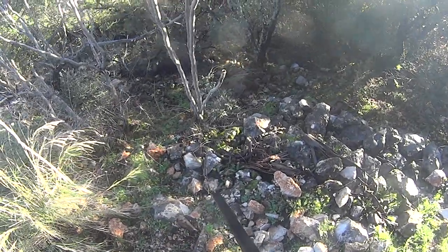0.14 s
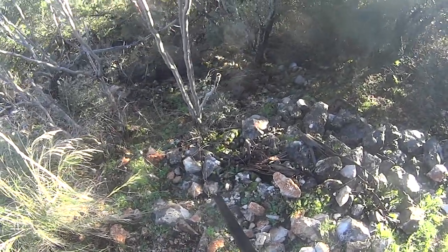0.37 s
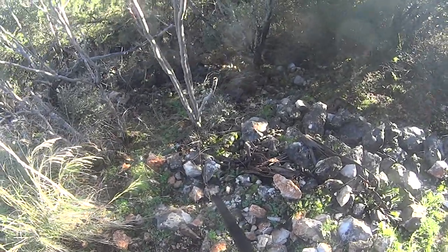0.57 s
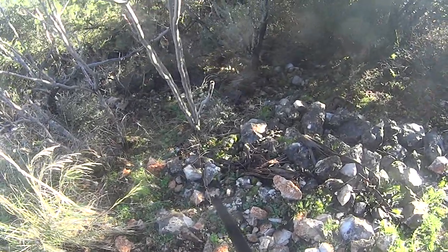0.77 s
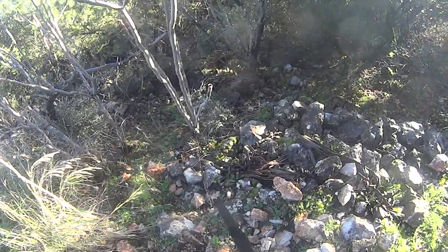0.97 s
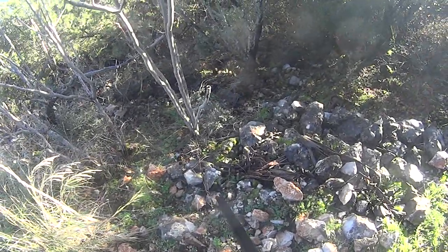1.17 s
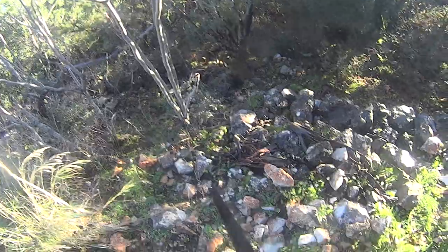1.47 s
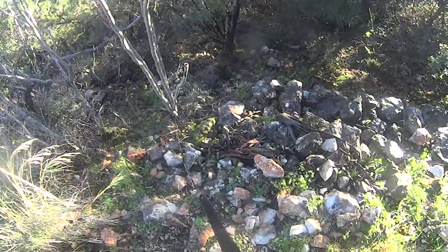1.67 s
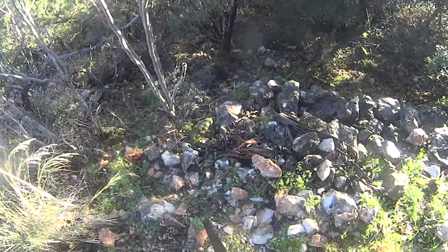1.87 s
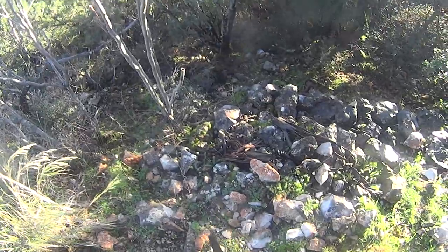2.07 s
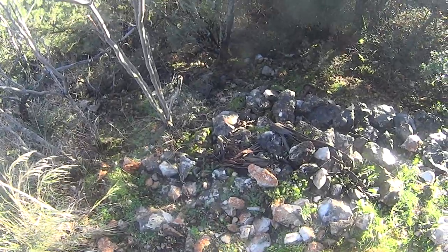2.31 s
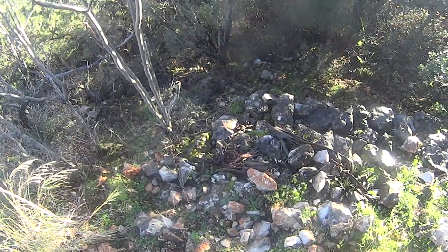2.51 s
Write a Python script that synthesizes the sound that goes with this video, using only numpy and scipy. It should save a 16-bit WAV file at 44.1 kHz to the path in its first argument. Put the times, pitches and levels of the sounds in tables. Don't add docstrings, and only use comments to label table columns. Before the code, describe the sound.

A young wild boar squeals three times, at about 0.9, 1.4 and 2.1 seconds, each under 0.2 seconds, nasal, falling in pitch and breaking into roughness, with short scattered reflections from scrub. Close twig snaps, stone knocks and grass rustle are dense and loudest in the first 0.8 seconds, sharpest near 0.13, then sparser, with another snap near 2.1, fading over faint outdoor hush by 2.6.

```python
import sys
import numpy as np
from scipy import signal
from scipy.fft import rfft, irfft, next_fast_len
from scipy.io import wavfile
from scipy.ndimage import uniform_filter1d

SR = 44100
rng = np.random.default_rng(int(sys.argv[2]) if len(sys.argv) > 2 else 0)


def attenuation_scalar(level_db):
    decades = np.asarray(level_db, float) / 20
    return 10 ** decades


def wav_out(sig):
    wavfile.write(sys.argv[1], SR, np.round(np.clip(np.atleast_2d(sig).T, -1, 1) * 32767).astype(np.int16))


N = 116865


def evened(x):
    return x / np.sqrt(np.mean(x ** 2) + 1e-20)


def slow_noise(first, second):
    noise = uniform_filter1d(rng.standard_normal(N), first)
    return evened(uniform_filter1d(noise, second))


def read(points, hz):
    f, value = np.transpose(points)
    return np.interp(np.log(hz + 1), np.log(f + 1), value)


def colour(x, gain):
    size = next_fast_len(N + SR // 4)
    return irfft(rfft(x, size) * gain(np.fft.rfftfreq(size, 1 / SR)), size)[..., :N]


def peak(hz, centre_hz, width):
    return 1j * hz * width / (centre_hz ** 2 - hz ** 2 + 1j * hz * width)


def housing(hz):
    # (frequency [Hz], width [Hz], level [dB])
    cavities = [(2900, 420, 8), (4750, 700, 5), (7900, 1500, 0)]
    return sum(attenuation_scalar(db) * peak(hz, f, w) for f, w, db in cavities)


def ports(x):
    # (frequency [Hz], lead [radians])
    lead = [(100, 0.23), (600, 1.4), (1200, 0.5), (2100, 1.11), (2900, 0.34), (5800, 0.3), (11000, 0.046)]
    # (frequency [Hz], difference [dB])
    tilt = [(100, -13), (1000, -0.5), (3000, -0.7), (8000, 1.5)]

    def turn(hz):
        return np.exp(.5j * read(lead, hz)) * attenuation_scalar(.5 * read(tilt, hz))

    return np.array([colour(x, turn), colour(x, lambda hz: 1 / turn(hz))])


def spread(one, other):
    # (frequency [Hz], correlation [-1 to 1])
    likeness = [(60, 1), (170, 0.3), (490, -0.58), (1420, -0.5), (4060, 0.052), (11700, 0.44)]

    def same(hz):
        return np.clip(read(likeness, hz), -1, 1)

    unlike = colour(other, lambda hz: np.sqrt(1 - same(hz) ** 2))
    return np.array([one, colour(one, same) + unlike])


def scrub(x):
    t60_s, level_db = 0.27, -3
    t = np.arange(SR // 2) / SR
    taps = rng.standard_normal((2, len(t))) * (rng.random((2, len(t))) < .05)
    taps = taps * attenuation_scalar(-60 * t / t60_s) * (t > .008)
    taps = taps / np.linalg.norm(taps[0])
    return attenuation_scalar(level_db) * signal.fftconvolve(x[None], taps, axes=1)[:, :N]


def hush():
    # (frequency [Hz], level [dB])
    air_tone = [(15, -10), (25, -14), (500, -9), (970, -11.5), (11300, -25), (14700, -40), (22000, -120)]
    noise = colour(rng.standard_normal((2, N)), lambda hz: attenuation_scalar(read(air_tone, hz)))
    return attenuation_scalar(-58) * spread(*evened(noise))


def patchy(x):
    patch_db = 2.5
    z = signal.stft(x, nperseg=256)[2]
    field = uniform_filter1d(rng.standard_normal(z.shape[1:]), size=6, axis=0)
    field = evened(uniform_filter1d(field, size=9, axis=1))
    return signal.istft(z * attenuation_scalar(patch_db * field), nperseg=256)[1][:, :N]


def grass():
    # (time [s], level [dB])
    stirring = [(0, -45.5), (.15, -46), (.33, -51), (.43, -55), (.46, -48), (.56, -43), (.68, -53.5),
                (1.1, -49), (1.24, -53), (1.36, -63), (1.47, -51.5), (1.72, -59.5), (1.872, -52),
                (1.96, -66), (2.1, -56), (2.35, -59.5), (2.55, -57), (2.65, -69)]
    # (frequency [Hz], level [dB])
    rustle_tone = [(410, -77), (700, -10), (2400, -8.5), (2800, -4), (4510, -5.5), (8060, -6), (11300, -14),
                   (14700, -47), (22000, -120)]
    grains_per_s, grain_spread_db, hiss_db = 2600, 1, -1
    housing_db, near_db, around_db = -5.5, -1.5, -6

    size = attenuation_scalar(grain_spread_db * np.minimum(rng.exponential(1, (3, N)), 3))
    size = size * rng.standard_normal((3, N))
    grains = evened(size * (rng.random((3, N)) < grains_per_s / SR))
    rustle = grains + attenuation_scalar(hiss_db) * rng.standard_normal((3, N))

    def tone(hz):
        return attenuation_scalar(read(rustle_tone, hz)) * (1 + attenuation_scalar(housing_db) * housing(hz))

    near, one, other = evened(patchy(colour(rustle, tone)))
    s, db = np.transpose(stirring)
    level = attenuation_scalar(np.interp(np.arange(N) / SR, s, db))
    return level * (attenuation_scalar(near_db) * ports(near) + attenuation_scalar(around_db) * spread(one, other))


def thud():
    knock_times = [.0392, .1278, .129, .382, .4192, .5965, .5988, .7136, .9515, 1.0055, 1.1885, 1.2085,
                   2.0948]
    # (peak level [dB], ring [Hz], width [Hz])
    pieces = [(-32.5, 3100, 1100), (-8.5, 5000, 5600), (-41, 580, 560), (-37.5, 1030, 270),
              (-21.5, 4440, 6500), (-43.5, 3200, 650), (-28, 2960, 420), (-20.5, 6350, 3200),
              (-28, 2200, 5400), (-36, 430, 1400), (-26, 9100, 6200), (-41, 4750, 990), (-24, 5600, 5800)]
    splinter_db, splinter_s = -19, .003
    out, t = np.zeros(N), np.arange(1024) / SR
    hz = np.fft.rfftfreq(1024, 1 / SR)
    for s, (db, ring_hz, width) in zip(knock_times, pieces):
        splinters = rng.standard_normal(1024) * np.exp(-t / splinter_s)
        blow = (t == 0) + attenuation_scalar(splinter_db) * splinters
        knock = irfft(rfft(blow) * peak(hz, ring_hz, width) ** 2)
        out[round(s * SR):][:1024] += attenuation_scalar(db) * knock / abs(knock).max()
    return out


def snaps(rows, sharpness):
    tick_s, late_s = .00015, .0008
    creak_s, creak_db = .001, -23
    rattle_s, rattle_db = .003, -22
    notch_hz, notch_width_hz = 2370, 520
    lead = 128
    t, out = (np.arange(1024) - lead) / SR, np.zeros(N + 1024)
    hz = np.fft.rfftfreq(1024, 1 / SR)
    creak = attenuation_scalar(creak_db) * np.exp(t / creak_s)
    rattle = attenuation_scalar(rattle_db) * np.exp(-abs(t) / rattle_s)
    for s, db, ring_hz in rows:
        tick = rng.standard_normal(1024) * np.exp(-abs(t) / tick_s)
        crackle = rng.standard_normal(1024) * np.where(t < 0, creak, rattle)
        shape = tick / np.linalg.norm(tick) + crackle
        body = peak(hz, ring_hz, ring_hz / sharpness) * peak(hz, ring_hz, ring_hz)
        ring = irfft(rfft(shape) * body)
        out[round((s + late_s) * SR) - lead:][:1024] += attenuation_scalar(db) * ring / abs(ring).max()
    return colour(out[:N], lambda f: 1 - peak(f, notch_hz, notch_width_hz))


def twigs():
    # (time [s], peak level [dB], ring [Hz])
    thick_sticks = [(0.004, -30, 1100), (0.012, -35, 1300), (0.125, -31, 1146), (0.134, -27, 1500),
                    (0.351, -41.5, 1410), (0.379, -41, 1980), (0.487, -39.5, 1320), (0.615, -44, 1320),
                    (0.766, -41.5, 1310), (0.991, -31, 1700), (1.17, -36.5, 2250), (1.25, -33, 1630),
                    (1.354, -39, 1870), (1.635, -42, 1730), (1.7, -42.5, 1380), (1.831, -42.5, 1300),
                    (2.081, -34, 1580)]
    dry_twigs = [(0.0034, -29.5, 2980), (0.0715, -29, 2590), (0.116, -22.5, 4420), (0.1393, -19.5, 2980),
                 (0.1642, -32, 2820), (0.2363, -28.5, 3240), (0.271, -32.5, 4960), (0.298, -32, 3250),
                 (0.3811, -23, 2730), (0.4194, -30, 3180), (0.4596, -30, 3300), (0.487, -34.5, 3050),
                 (0.5115, -28.5, 4830), (0.5504, -31, 3030), (0.581, -28, 4870), (0.7069, -33.5, 3000),
                 (0.7423, -36, 3200), (0.7488, -30.5, 3040), (0.8118, -37, 4670),
                 (0.8525, -41, 4850), (0.8594, -35, 3120), (0.9618, -28, 3370), (0.9986, -30, 2800),
                  (1.061, -46, 3000), (1.2508, -33.5, 2600), (1.353, -32.5, 2970), (1.6368, -35, 2800),
                  (1.699, -39.5, 2930), (1.8038, -36.5, 2600), (1.9092, -35, 2760), (2.0801, -25, 2550),
                  (2.086, -39, 4760), (2.095, -32.5, 2900), (2.1053, -33.5, 4850), (2.1961, -33, 2900),
                  (2.4142, -51.5, 2650), (2.469, -40, 4530), (2.5439, -42.5, 4370)]
    dry_stalks = [(0.1151, -17, 5950), (0.1334, -10, 7800), (0.1394, -28, 6550), (0.1615, -23, 8300),
                  (0.4474, -28, 8200), (0.4923, -26, 7660), (0.5755, -29.5, 7400), (0.8111, -32.5, 8700),
                  (0.853, -29, 5900), (1.8502, -35, 8370), (2.1054, -39, 8050), (2.2598, -41, 6400)]
    # (time [s], peak level [dB], ring [Hz])
    more_ticks = [(.0105, -32.5, 5400), (.050, -39, 8000), (.2335, -31, 2880), (.247, -29, 2860),
                  (.265, -32.5, 2800), (.448, -31, 4900), (.460, -30, 4660), (.4755, -37, 2900),
                  (.5145, -32.5, 5000), (.546, -27, 8000), (.5535, -27, 7950), (.718, -39, 6300),
                  (.807, -38, 3200), (.8215, -44, 5000), (.8635, -31.5, 3050), (1.106, -35.5, 7800),
                  (1.146, -41, 7660), (1.209, -34.5, 7760), (1.23, -44, 3020), (1.265, -42, 2870),
                  (1.334, -44, 6000), (1.6402, -40, 5100), (1.768, -47, 7400), (1.8075, -57, 2970),
                  (1.832, -46, 3000), (2.113, -41, 3860)]
    dull_hz, housing_db = 9000, -8

    wood = snaps(thick_sticks, 2.8) + snaps(dry_twigs, 3.2)
    wood = wood + snaps(dry_stalks, 2.4) + snaps(more_ticks, 3.2) + thud()

    def tone(hz):
        return (1 + attenuation_scalar(housing_db) * housing(hz)) / np.sqrt(4 + 4 * (hz / dull_hz) ** 8)

    return colour(wood, tone)


def squeal(curve):
    # (frequency [Hz], width [Hz], level [dB])
    throat_peaks = [(615, 660, -5), (880, 400, -6), (1320, 650, -7), (2650, 400, -25)]
    # (time [s], half length [s])
    catches = [(.899, .004), (.922, .005), (2.115, .007)]
    # (time [s], half length [s], level [dB])
    breaks = [(.943, .006, 0), (.958, .01, -5), (.98, .008, -8), (1.434, .01, -5), (1.47, .012, -7),
              (2.159, .008, -2), (2.172, .006, -9)]
    mouth_hz, mouth_width_hz, mouth_db = 1757, 500, 0.5
    jitter, flutter_db, flutter_s = .004, 1.1, .007
    rasp_db, doubled_rasp_db = -20, -16
    sink_db, closed_sink_db, closing, catch_db = -5, -12, .1, -14

    t = np.arange(N) / SR
    s, *columns = np.transpose(curve)
    pitch, effort_db, double_db, mouth = (np.interp(t, s, c) for c in columns)

    def wobble():
        return slow_noise(round(flutter_s * SR), 90)

    turns = np.cumsum(pitch / 2 * (1 + jitter * wobble())) / SR
    caught_db = catch_db * sum(np.exp(-((t - at) / half) ** 2) for at, half in catches)
    closed_db = closed_sink_db * np.clip((1 - mouth) / closing, 0, 1) * (double_db > 0)
    grit = sum(attenuation_scalar(db) * np.exp(-((t - at) / half) ** 2) for at, half, db in breaks)
    peaks = [*throat_peaks, (mouth_hz * mouth, mouth_width_hz, mouth_db)]

    voice = np.zeros(N)
    for k in range(2, 12):
        throat = sum(attenuation_scalar(db) * abs(peak(k * pitch / 2, f, w)) ** 3 for f, w, db in peaks)
        roughness = attenuation_scalar(rasp_db) + (k > 3) * (attenuation_scalar(doubled_rasp_db + double_db) + grit)
        rasp = 1 + roughness * slow_noise(100, 60)
        db = (k % 2) * double_db + (k == 2) * sink_db * attenuation_scalar(double_db)
        db = db + (k == 4) * (closed_db + caught_db) + (k > 6) * closed_db
        level = attenuation_scalar(db + flutter_db * wobble())
        voice += throat * level * rasp * np.sin(2 * np.pi * k * turns)
    sounding = uniform_filter1d(((t > s[0]) & (t < s[-1])) * 1., 200)
    return voice * attenuation_scalar(effort_db) * sounding


def boar():
    # (time [s], pitch [Hz], effort [dB], doubling [dB], mouth opening [ratio])
    first = [(.870, 575, -62, -6, .85), (.882, 598, -45, -9, .85), (.895, 640, -43, -16, 1.08),
             (.915, 644, -41, -18, 1.09), (.934, 622, -46, -14, 1.06), (.941, 622, -46, 3, .97),
             (.958, 578, -48, 4, .95), (.992, 542, -54, 3, .96), (1.012, 530, -68, 2, .93)]
    second = [(1.416, 701, -64, -6, 1.23), (1.432, 696.4, -45.5, 2.5, 0.98), (1.45, 671, -45, 2.5, 1.01),
              (1.466, 613, -49, -8, 1.06), (1.492, 562, -47.5, -20, 0.98), (1.518, 616, -49.5, -26, 0.87),
              (1.531, 590, -46, -17, 0.8), (1.541, 550, -52.5, -23, 0.85), (1.58, 605, -70, -8, 0.88)]
    third = [(2.092, 700, -59, -24, 1.1), (2.106, 678, -46, -24, 1.14), (2.125, 634, -41.5, -24, 1.07),
             (2.139, 584, -44, -22, 1.0), (2.149, 565, -54, -18, 1), (2.154, 528, -50, 5, .82),
             (2.18, 530, -49, 6, .82), (2.203, 528, -57, 2, .9), (2.245, 500, -72, 1, .83)]
    return squeal(first) + squeal(second) + squeal(third)


def scene():
    voice, wood = boar(), twigs()
    direct = ports(voice + attenuation_scalar(4.5) * wood)
    echoes = scrub(attenuation_scalar(-5) * voice + attenuation_scalar(-4) * wood)
    return direct + echoes + grass() + hush()


def top_cut(x):
    return signal.sosfilt(signal.butter(12, 12260, fs=SR, output="sos"), x)


def record(dry):
    edge_hz, leak_db = 11010, -33
    edge = signal.firwin(255, edge_hz, window=("kaiser", 6), fs=SR)[None]
    mix = signal.oaconvolve(dry, edge, "same") + attenuation_scalar(leak_db) * dry
    return top_cut(mix)


dry = scene()
out = record(dry)
wav_out(out)
```